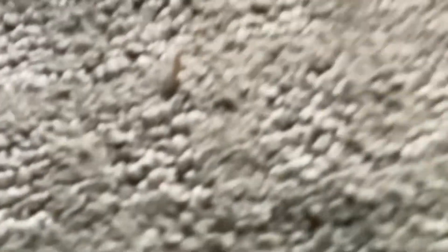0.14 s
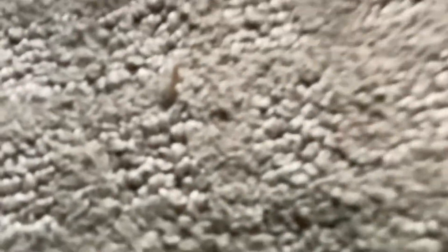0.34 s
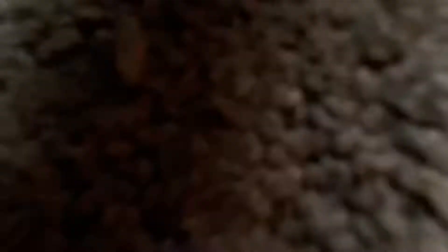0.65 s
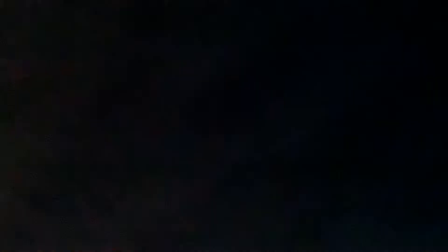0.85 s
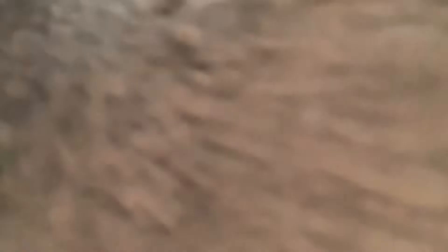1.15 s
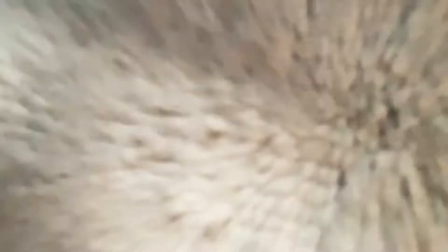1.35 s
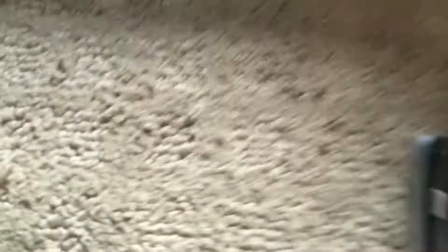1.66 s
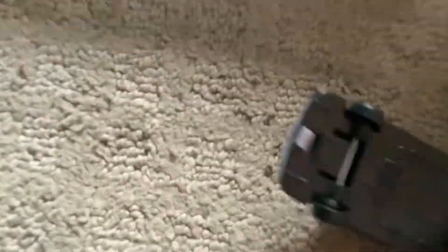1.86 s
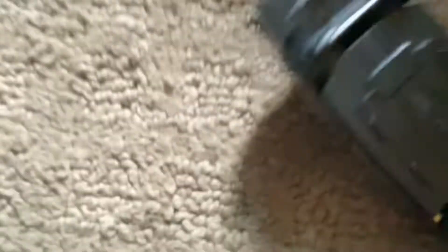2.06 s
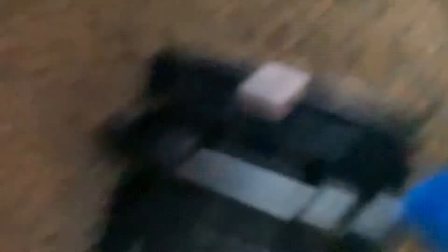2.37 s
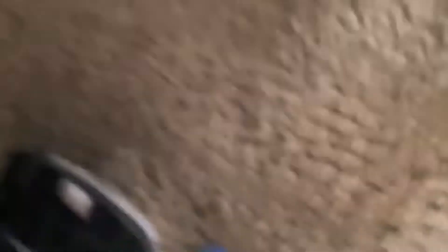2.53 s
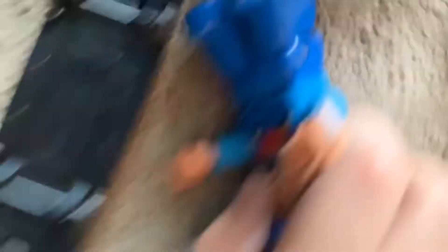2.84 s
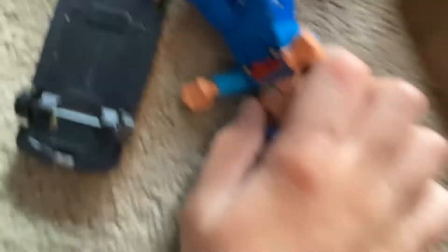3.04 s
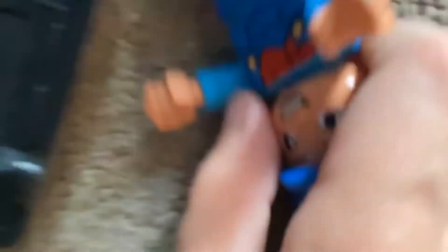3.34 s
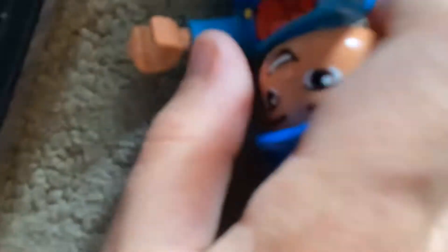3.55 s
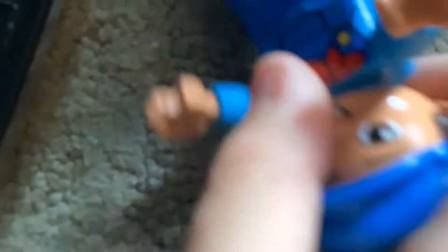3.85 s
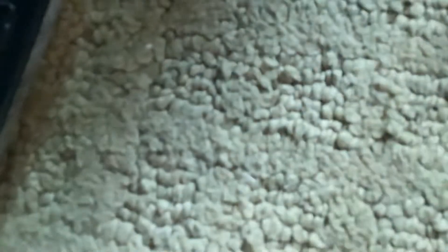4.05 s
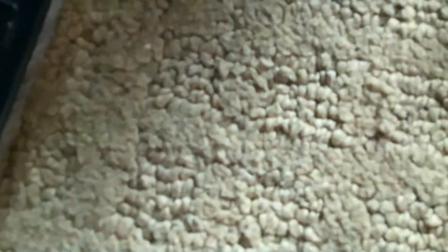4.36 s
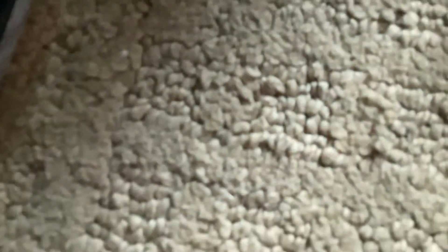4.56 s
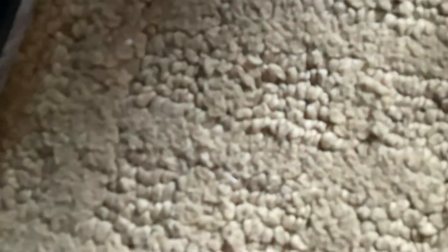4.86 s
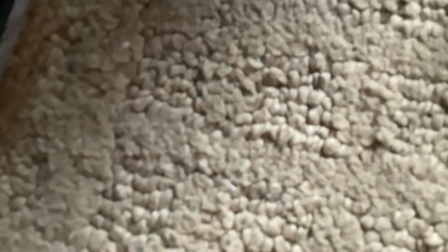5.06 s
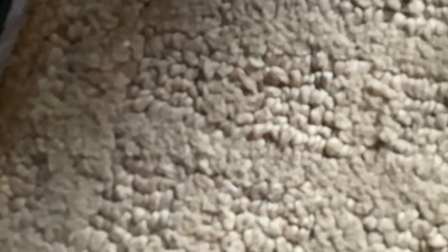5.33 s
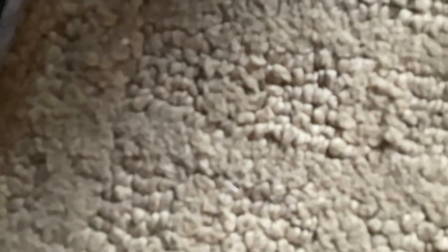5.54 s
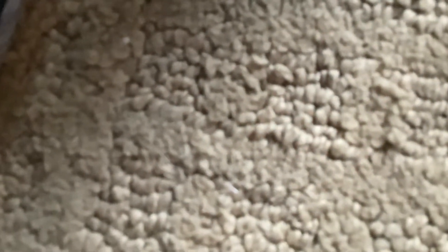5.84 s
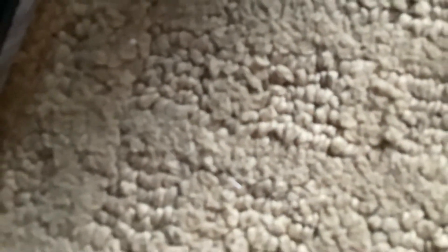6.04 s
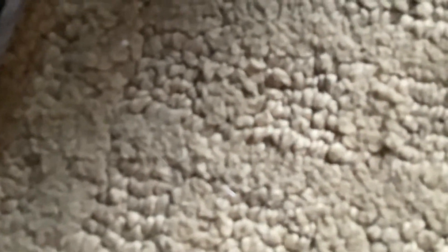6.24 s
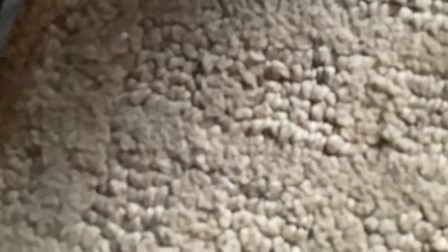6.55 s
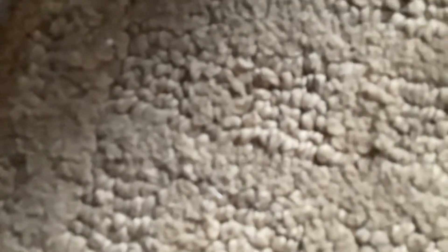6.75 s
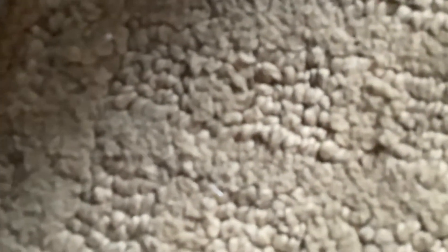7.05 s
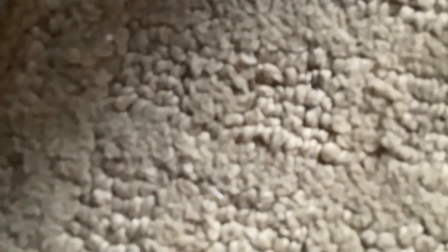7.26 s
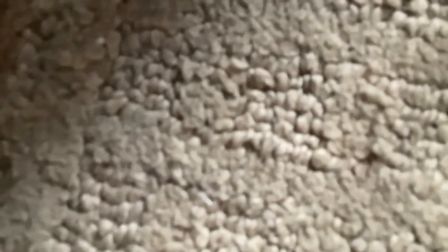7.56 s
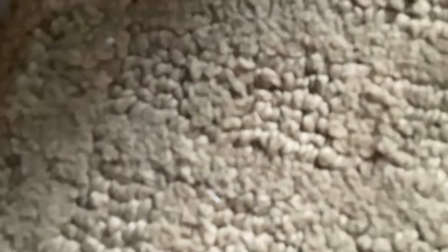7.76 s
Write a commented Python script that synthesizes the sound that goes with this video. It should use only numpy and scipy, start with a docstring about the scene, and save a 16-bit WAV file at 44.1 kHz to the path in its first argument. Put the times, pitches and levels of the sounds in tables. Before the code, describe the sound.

A toy figure's plastic parts snap and slide very near the microphone, ending in one hollow clack. The phone is gripped and bumped, giving loud rubs, cracks and low thuds, then one more heavy bump. Dull finger taps patter softly. More distant plastic bricks click against each other over carpet, quick and uneven, before fading into the quiet, low hum of a dry indoor room.

```python
"""Plastic clicks, scrapes and one hollow clack are heard close by, among rubs, knocks and soft taps.
A hand moves a toy figure about on a carpet while the other holds a phone: struck and sliding parts
ring in their modes, and skin slips over the case. Loose plastic bricks are picked over further off,
as short ticks with scuffs between them. A low hum of shaped noise fills the small, dead room."""
import sys
import numpy as np
from scipy import signal
from scipy.fft import rfft, irfft, next_fast_len
from scipy.io import wavfile
from scipy.ndimage import uniform_filter1d

SR = 44100
rng = np.random.default_rng(int(sys.argv[2]) if len(sys.argv) > 2 else 0)


def wav_record(signal):
    """Record a signal, one row per channel, as 16-bit PCM in the file named by sys.argv[1]."""
    frames = np.transpose(np.atleast_2d(signal))
    bounded = np.clip(frames, -1, 1)
    # unit amplitude maps onto the largest positive 16-bit level
    quanta = np.round(bounded * 32767).astype(np.int16)
    wavfile.write(sys.argv[1], SR, quanta)


N = 348390
TIME = np.arange(N) / SR
BLOW = np.arange(SR // 5) / SR  # time since a contact [s]
HEAD = SR // 100  # a blow's level is its rms over the first 10 ms [samples]

# modes of a brick: (frequency [Hz], level [dB], t60 relative to the blow's [ratio])
BRICK_MODES = [(478, -6.5, 1.53), (735, -6.5, 1.1), (1150, -10, 0.65), (2430, 0.5, 0.85),
               (3050, -5.5, 0.85), (3760, -3.5, 1.35), (5610, -7.5, 1.07), (7400, -3, 1.66)]


def undb(db):
    """Decibels to gain."""
    return 10 ** (db / 20)


def unit(x):
    """Scale to rms 1."""
    return x / np.sqrt(np.mean(x ** 2))


def blow(x, db):
    """Set the level of a blow's attack."""
    return x * undb(db) / np.sqrt(np.mean(x[:HEAD] ** 2))


def fade(t60):
    """Exponential decay after a contact, down 60 dB after t60 seconds."""
    return np.exp(-np.log(1000) * BLOW / t60)


def band(x, edges, kind, order=2):
    """Causal Butterworth filter."""
    return signal.sosfilt(signal.butter(order, edges, kind, fs=SR, output="sos"), x)


def resonate(x, hz, q):
    """One resonance, gain 1 at its centre."""
    return signal.lfilter(*signal.iirpeak(hz, q, fs=SR), x)


def colour(x, points):
    """Shape a spectrum by (Hz, dB) points, joined along log frequency; rms 1."""
    hz, db = np.transpose(points)
    size = next_fast_len(N)
    f = np.maximum(np.fft.rfftfreq(size, 1 / SR), 1)
    gain = undb(np.interp(np.log(f), np.log(hz), db))
    return unit(irfft(rfft(x, size) * gain, size)[:N])


def walk(rate):
    """Smooth random wander through about rate new values a second; rms 1."""
    k = int(SR / rate)
    steps = np.repeat(rng.standard_normal(N // k + 1), k)
    return unit(uniform_filter1d(steps, k)[:N])


def grains(rate, spread_db):
    """Tiny slips of unequal size and random sign, about rate a second; rms 1."""
    size = undb(spread_db * np.minimum(rng.exponential(size=N), 3))
    slipping = rng.random(N) < rate / SR
    return unit(slipping * size * rng.choice([-1, 1], N))


def add(out, s, x):
    """Mix a blow in at time s."""
    i = int(s * SR)
    out[i:i + len(x)] += x[:N - i]


def spells(table, attack_s, sag_db_per_s, release_s):
    """Gain of sustained movements: each sets in, drifts steadily in level, and dies away."""
    gain = np.zeros(N)
    for s, length, db in table:
        age = np.maximum(TIME - s, 0)
        attack = np.minimum(age / attack_s, 1)
        level = undb(db - sag_db_per_s * np.minimum(age, length))
        release = np.exp(-np.maximum(age - length, 0) / release_s)
        gain += attack * level * release
    return gain


def swell(middle_s, length_s):
    """Gain of one stroke: it rises to a rounded peak and falls a little faster."""
    end_db, roundness, lean = 3.5, 2.06, 0.054  # the drop near each end is about end_db
    along = np.clip(2 * (TIME - middle_s) / length_s, -10, 10)
    leaning = along * (1 + lean * np.sign(along))
    return undb(-end_db * np.abs(leaning) ** roundness)


def disperse(x, turns):
    """Bending waves: each pitch arrives about turns of its own cycles late, a quick downward sweep."""
    f = np.fft.rfftfreq(len(x), 1 / SR) + 80  # the offset limits the delay of the bass
    return irfft(rfft(x) * np.exp(-2j * np.pi * turns * np.log(f / f[-1])), len(x))


def weigh(x, db, body_db, edge_db):
    """A heavy contact moves the body, a hard one sharpens the edge, a soft one dulls the ring."""
    low, high = 1500, 7000  # where the body ends and the edge begins [Hz]
    top = np.clip(high * 2 ** ((edge_db + 11.5) / 32), 2 * low, high)
    ring = blow(band(x, [low, top], "bandpass", order=4), db)
    body = blow(band(x, low, "lowpass", order=6), db + body_db)
    edge = blow(band(x, [high, 2 * high], "bandpass", order=3), db + edge_db)
    return ring + body + edge


def chatter(x, count, spread_s, size):
    """Loose parts touch several more times in quick succession, later touches tending lighter."""
    out = x.copy()
    for late, weight in rng.random((count, 2)):
        echo = np.pad(x, (int(late * spread_s * SR), 0))[:len(x)]
        out += echo * size * (1 - late / 2) * (2 * weight - 1)
    return out


def strike(modes, t60, ring_hz, crack, scatter_db, detune, contact_s):
    """A plastic part is hit: a noise crack and its modes, weighted anew by each point of contact."""
    hz, mode_db, hold = np.transpose(modes)
    shift, weight, side = rng.standard_normal((3, len(hz)))
    gains = np.sign(side) * undb(mode_db + scatter_db * weight)
    x = crack * rng.standard_normal(len(BLOW)) * fade(t60)
    for f, g, h in zip(hz * (1 + detune * shift), gains, hold):
        x += g * np.sin(2 * np.pi * f * BLOW) * fade(t60 * h)
    # the part that is touched rings most, and the push takes a moment to build
    return (x + 1.5 * resonate(x, ring_hz, 3.4)) * (1 - fade(contact_s))


def sliding(modes, gain, rate, spread_db, q, wander_s, scrape_db):
    """Stick and slip scrapes and keeps modes ringing; they swell and bend as the contact moves."""
    slips = grains(rate, spread_db)
    ring = sum(undb(db + 4.5 * walk(25)) * resonate(slips, hz, q * hold) for hz, db, hold in modes)
    bent = np.interp(TIME + wander_s * walk(24), TIME, ring)
    scrape = band(slips, [2000, 12000], "bandpass")
    return (unit(bent) + undb(scrape_db) * unit(scrape)) * gain


def room(x, t60, wet_db, dull_hz):
    """A short, quiet noise tail, its treble rolled off above dull_hz: the carpet swallows most of it."""
    tail = rng.standard_normal(len(BLOW)) * fade(t60) * (BLOW > .005)
    tail = band(tail, dull_hz, "lowpass", order=1)
    return x + undb(wet_db) * signal.fftconvolve(x, tail / np.linalg.norm(tail))[:len(x)]


def hum():
    """Low ventilation rumble and faint hiss from shaped noise, with a narrow drone of filtered noise."""
    # spectrum of rumble and hiss: (frequency [Hz], density [dB per Hz])
    spectrum = [(30, -38.5), (60, -12.5), (80, -10), (96, 0), (125, -11), (205, -10), (330, -22),
                (520, -29.5), (1100, -46), (3500, -52), (10000, -55), (16000, -63.5)]
    rumble = colour(rng.standard_normal(N), spectrum) * undb(-55.5 + 0.16 * walk(1.7))
    drone = unit(band(rng.standard_normal(N), [89, 101], "bandpass"))
    return rumble + undb(-59.5) * drone


def brick_tick(db, body_db, edge_db, body_hz):
    """One brick of random size cracks on another: rough tick, lower body, dull floor thud, room tail."""
    size_hz = 3000 * 2 ** rng.uniform(-0.52, 0.46)
    tick = strike(BRICK_MODES, 0.013, size_hz, crack=2.55, scatter_db=2.5, detune=0.051, contact_s=0.0071)
    tick = band(tick + 2 * resonate(tick, body_hz, 3.2), 140, "highpass")
    tick = weigh(chatter(tick, count=5, spread_s=0.009, size=.65), db, body_db, edge_db)
    thud = band(rng.standard_normal(len(BLOW)) * fade(0.084), [130, 260], "bandpass")
    thud = blow(thud, db + body_db - 5.5)  # the carpeted floor
    return room(disperse(tick + thud, turns=1.399), t60=0.18, wet_db=-15.5, dull_hz=2930)


def bricks():
    """Loose bricks click, and in between they nudge and scuff each other and rumble on the carpet."""
    # single clicks: (time [s], level [dB], body re level [dB], edge re level [dB], body pitch [Hz])
    ticks = [(4.806, -52, 10.5, -11, 478), (4.8182, -57, 9, -22, 430), (4.8627, -57, 9, -13, 445),
             (4.929, -53.5, 1, -35, 560), (4.985, -54.5, -2, -6.5, 596), (5.018, -56, 0, -33, 640),
             (5.1344, -45.5, -2.5, -6, 500), (5.14, -51.5, 6, -15, 680), (5.252, -60.5, 12, -14, 252),
             (5.3318, -58.5, -1.5, -8, 494), (5.389, -55, -3, -39, 600), (5.4693, -45.5, 4, -18.5, 740),
             (5.5491, -62, 10, -36, 551), (5.8112, -67.5, 10, -27, 511), (5.8781, -65.5, 0.5, -11, 520),
             (6.082, -70, 14.5, -36, 1200), (6.1336, -50.5, -2.5, -27, 1200), (6.1756, -67.5, 7, -17, 750),
             (6.2225, -56, -4.5, -30, 1250), (6.266, -63.5, 1, -5, 1144), (6.3034, -61, -0.5, -39, 1200),
             (6.3749, -48, 9, -5.5, 910), (6.4123, -48, 1, -16, 890), (6.4715, -54, 4, -7, 600),
             (6.4871, -42.5, 0.5, -15.5, 690), (6.5454, -43.5, -1, -14, 520), (6.724, -58.5, 10, -16, 516)]
    # spells in which bricks shift among each other: (start [s], length [s], reference level [dB])
    shifts = [(4.797, 0.74, -70.5), (6.086, 0.22, -74), (6.46, 0.13, -58), (6.959, 0.21, -77.5)]
    # one brick drags over another: (middle [s], length [s], level [dB], strongest ring [Hz])
    drags = [(5.125, 0.031, -62, 2000), (5.334, 0.022, -60.5, 7600), (5.433, 0.026, -64, 4600),
             (6.115, 0.034, -69, 1690), (6.542, 0.021, -49, 2400), (6.905, 0.056, -70.5, 2150)]
    out = np.zeros(N)
    for s, db, body_db, edge_db, body_hz in ticks:
        add(out, s, brick_tick(db, body_db, edge_db, body_hz))

    gap_s = 0.016  # mean time between small touches
    for start, length, db in shifts:
        slots = np.arange(start, start + length, gap_s)
        for s, (late, force) in zip(slots, rng.standard_normal((len(slots), 2))):
            touch = brick_tick(db - 3 + 3 * force, body_db=9.5, edge_db=-18, body_hz=585)
            add(out, s + gap_s * late / 2, touch)

    # slow shifting is softer and duller than a tick, and rings in the bricks' modes
    stir = spells(shifts, attack_s=0.008, sag_db_per_s=0, release_s=0.04) * undb(3.5 * walk(50))
    uneven = undb(3.5 * walk(120))
    grit = sliding(BRICK_MODES, uneven, rate=1300, spread_db=3.0, q=5.8, wander_s=0.0012, scrape_db=-17)
    shifting = undb(-7.5) * stir * band(grit, 6000, "lowpass", order=1)
    scuffs = sum(undb(db) * swell(s, length) * unit(resonate(grit, hz, 1.8)) for s, length, db, hz in drags)
    # the pile's rumble on the carpet stops growing with harder handling
    rumble = unit(band(rng.standard_normal(N), [130, 260], "bandpass"))
    pile = np.minimum(stir, undb(-66.5)) * undb(12.5) * rumble
    return out + scuffs + shifting + pile


def taps():
    """Soft fingertips give a dull, damped sine blip, the nail a faint tick of filtered noise."""
    # fingertip taps: (time [s], pad level [dB], nail re pad [dB])
    touches = [(2.141, -47, -17), (2.303, -48.5, -19), (2.8878, -47.5, -14), (3.097, -51.5, -7.5),
               (3.254, -47.5, -9), (3.352, -48, -11), (3.4116, -53.5, -9), (3.46, -50.5, -36.5),
               (3.503, -58.5, -16), (3.646, -53, -14), (3.7152, -56, -11.5), (3.824, -56.5, -13),
               (3.9796, -53.5, -17), (4.0301, -56.5, -17), (4.1254, -58.5, -14), (4.283, -59.5, -13.5),
               (4.3328, -61, -19.5)]
    out = np.zeros(N)
    for s, db, nail_db in touches:
        hz = 535 * (1 + 0.11 * rng.standard_normal())
        pad = np.sin(2 * np.pi * hz * BLOW) * fade(0.018) * (1 - fade(0.023))
        nail = band(rng.standard_normal(len(BLOW)) * fade(0.13), [1100, 2100], "bandpass", order=3)
        add(out, s, blow(pad, db) + blow(nail, db + nail_db))
    return out


def rubbing():
    """Skin and cloth drag over the case in dense, uneven slips, giving a dull rub, a rasp and a hiss."""
    # strokes over the case: (middle [s], length [s], level [dB], hiss re level [dB])
    strokes = [(0.104, 0.025, -56, -16), (0.494, 0.044, -40.5, -7.5), (0.551, 0.12, -52, -1),
               (0.781, 0.09, -48.5, -8), (0.862, 0.046, -38.5, -8), (0.967, 0.094, -28, -43),
               (1.067, 0.04, -33, -24.5), (1.146, 0.088, -36, -37.5), (1.28, 0.072, -43, -19),
               (1.377, 0.085, -50, -5.5), (1.567, 0.09, -47.5, -31), (1.76, 0.13, -45, -15),
               (2.444, 0.12, -42.5, -35), (2.512, 0.078, -42.5, -7.5), (2.564, 0.019, -39.5, -18),
               (2.645, 0.091, -52.5, -22), (2.79, 0.084, -49, -8), (2.97, 0.11, -47, -14),
               (3.374, 0.095, -59, -8), (3.69, 0.079, -68.5, -18), (3.808, 0.12, -70, 6.5),
               (4.436, 0.067, -68.5, -18), (7.295, 0.046, -84.5, 5.5), (7.553, 0.06, -87, 15),
               (7.766, .05, -80.5, -5)]
    # the palm creeps on the case while the grip shifts: (start [s], length [s], level [dB])
    grips = [(0, 0.48, -67.5), (1.4, 0.72, -56), (2.08, 0.73, -63), (3.1, 0.23, -71)]
    # spectra of the dull rub, the rasp and the hiss: (frequency [Hz], density [dB per Hz])
    skin_spectrum = [(100, -23), (290, -5.5), (550, -0.5), (1400, -1), (2000, -4.5), (2700, -11),
                     (4000, -23.5), (7000, -54.5)]
    rasp_spectrum = [(1200, -23.5), (2500, -3.5), (3500, -1.5), (6050, -5.5), (6400, -27), (9000, -50)]
    hiss_spectrum = [(4500, -27.5), (6400, 2), (10000, 2.5), (13000, -4), (16000, -7.5)]
    slips = grains(rate=2600, spread_db=4) + .5 * rng.standard_normal(N)
    slips *= undb(1.8 * walk(70))

    moves = [(undb(db) * swell(s, length), hiss_db) for s, length, db, hiss_db in strokes]
    creep = spells(grips, attack_s=0.0035, sag_db_per_s=-1.0, release_s=0.0104)
    moves.append((creep, -11.5))
    # movements add in power; the rasp gains 0.42 dB per dB of hiss
    drag = np.sqrt(sum(gain ** 2 for gain, _ in moves))
    rasp = np.sqrt(sum((gain * undb(0.5 + 0.42 * hiss_db)) ** 2 for gain, hiss_db in moves))
    hiss = np.sqrt(sum((gain * undb(hiss_db)) ** 2 for gain, hiss_db in moves))

    skin = colour(slips, skin_spectrum)
    # the case's resonances come and go as the contact travels
    skin = unit(skin + sum(walk(25) * resonate(skin, hz, 4.5) for hz in (620, 1150, 1850)) / 2)
    # a firm stroke makes the case itself resound
    pressure = np.clip((20 * np.log10(drag + 1e-9) + 36.3) / 15, 0, 1)
    case = unit(resonate(resonate(skin, 1700, 1.5), 1700, 1.5))
    skin = (1 - 0.56 * pressure) * skin + pressure * case
    return skin * drag + colour(slips, rasp_spectrum) * rasp + colour(slips, hiss_spectrum) * hiss


def thumps():
    """A jolt swings the phone in the soft grip of the hand: a damped sine with rustle, swept downward."""
    # jolts: (time [s], level [dB], pitch [Hz], t60 [s])
    jolts = [(0.867, -38, 152, 0.035), (0.997, -30, 233, 0.012), (1.053, -27, 208, 0.012),
             (1.124, -23.5, 180, 0.019), (1.467, -40, 291, 0.024), (1.474, -37.5, 180, 0.065),
             (2.477, -27.5, 173, 0.041), (2.479, -24.5, 81, 0.13)]
    out = np.zeros(N)
    for s, db, hz, t60 in jolts:
        rustle = unit(band(rng.standard_normal(len(BLOW)), [hz / 2, 2 * hz], "bandpass"))
        sway = (np.sin(2 * np.pi * hz * BLOW) + 0.35 * rustle) * fade(t60) * (1 - fade(0.017))
        add(out, s, disperse(blow(sway, db), turns=1.2))
    return out


def knocks():
    """The phone case answers a knock with a crack, a few falling swings and a brief rattle."""
    # knocks: (time [s], case level [dB], edge re case [dB], case pitch [Hz], sharpness of the ring [Q])
    hits = [(0.8054, -35, -34, 1040, 3.5), (0.823, -39, -7.5, 1080, 2.8), (0.866, -40.5, -6, 800, 1.8),
            (0.9976, -15, -31.5, 1390, 5.3), (1.0135, -28.5, -25, 815, 5), (1.035, -36, -17, 950, 3),
            (1.048, -26, -11, 1800, 8.6), (1.0562, -22, -23, 776, 7.9), (1.1244, -22.5, -30, 1060, 3.6),
            (1.143, -33.5, -14, 715, 3.6), (2.48, -12.5, -21, 1150, 1.4), (2.499, -23, -18, 944.5, 1.8),
            (2.5058, -32.5, -7.5, 2100, 3.6), (2.568, -45, -10, 790, 0.8)]
    out = np.zeros(N)
    for s, db, edge_db, hz, q in hits:
        noise = rng.standard_normal(len(BLOW))
        push = signal.unit_impulse(len(BLOW)) + .028 * noise * fade(.028)
        case = band(resonate(push, hz, q), [490, 3300], "bandpass", order=3)
        case = disperse(case, turns=0.8)
        edge = band(noise * fade(0.013), [2800, 11000], "bandpass")
        add(out, s, blow(case, db) + blow(edge, db + edge_db))
    return out


def toy():
    """The figure's joints click and slide, ringing in its modes; its hollow shell clacks once."""
    # joint clicks: (time [s], level [dB], body below 1.5 kHz re level [dB],
    # edge above 7 kHz re level [dB], t60 [s], strongest ring [Hz])
    clicks = [(0.122, -53.5, 11.5, -8.5, 0.01, 1400), (0.168, -33, -28, -1, 0.034, 3160),
              (0.182, -22, -20, -1, 0.014, 2600), (0.1987, -27, -19, -7.5, 0.022, 2850),
              (0.2317, -35.5, -22, 2, 0.038, 3430), (0.2657, -49.5, -16, 2, 0.023, 3400),
              (0.2869, -41.5, -34, -1.5, 0.023, 5200), (0.2895, -33.5, -42, -4, 0.012, 5600),
              (0.4098, -41, -33.5, 3, 0.029, 2740), (0.432, -37.5, -29.5, -6, 0.052, 5100),
              (0.596, -57, 1, 7, 0.01, 6060), (0.8955, -32, -16.5, -9.5, 0.0067, 4200),
              (2.1234, -36, -25, -14.5, 0.016, 5130), (2.1484, -36.5, -19, -10, 0.062, 5200),
              (2.186, -44.5, -30, -20, 0.057, 5130), (2.233, -53.5, -18, -2, 0.013, 5600),
              (2.2489, -26, -27, -8.5, 0.027, 2650), (2.259, -35, -22, -12.5, 0.013, 5400),
              (2.295, -47, -22, -15, 0.035, 5000), (2.303, -43, -19, -7.5, 0.02, 5100),
              (2.7395, -50, -24, -10, 0.048, 5000)]
    # the hollow shell snaps down: the same columns and units
    clacks = [(0.4691, -17.5, -4, -7.5, 0.025, 2036)]
    # plastic slides on plastic: (start [s], length [s], level at the start [dB])
    slides = [(.168, 0.1, -39.5), (.415, 0.044, -46), (2.11, 0.08, -52), (2.25, 0.082, -56.5)]
    # modes of the joints and of the shell: (frequency [Hz], level [dB], t60 relative to the blow's [ratio])
    joint_modes = [(1855, -13, 0.44), (2640, -4.5, 0.99), (3020, -10, 0.4), (3510, -6, 0.93),
                   (4276, -6, 0.7), (5030, -5.5, 1.5), (5310, -4, 1.2), (5960, -9, 0.73), (9300, -13, 0.55),
                   (10470, -14.5, 1.18), (12750, -9.5, 1.1)]
    shell_modes = [(408, -10, 2.008), (878, -0.5, 0.65), (1051, -9.5, 1.3), (1590, -6.5, 1),
                   (2095, -3.5, 1.7), (2930, 0.5, 0.42), (3970, 1, 0.75), (11530, 7, .5)]
    out = np.zeros(N)
    for s, db, body_db, edge_db, t60, hz in clicks:
        click = strike(joint_modes, t60, hz, crack=1.4, scatter_db=3.5, detune=0.022, contact_s=0.003)
        click = chatter(click, count=3, spread_s=0.2 * t60, size=.7)
        add(out, s, weigh(click, db, body_db, edge_db))
    for s, db, body_db, edge_db, t60, hz in clacks:
        clack = strike(shell_modes, t60, hz, crack=2.0, scatter_db=6.0, detune=0.013, contact_s=0.001)
        add(out, s, disperse(weigh(clack, db, body_db, edge_db), turns=1.1))
    push = spells(slides, attack_s=0.011, sag_db_per_s=72.5, release_s=0.024)
    return out + sliding(joint_modes, push, rate=2100, spread_db=3.5, q=8.6, wander_s=0.00055, scrape_db=-6.5)


def scene():
    """Hum, far bricks, contact sounds that reach the phone through its case, and the near toy."""
    contact = taps() + rubbing() + thumps() + knocks()
    near = room(toy(), t60=0.11, wet_db=-20.0, dull_hz=1500)
    return (hum() + bricks() + contact + near)[None]


def record(dry):
    """The phone drops the deepest bass, rounds the highest peaks and cuts the top above 15.6 kHz."""
    x = np.tanh(band(dry, 45, "highpass", order=3) / 2) * 2
    return signal.sosfilt(signal.ellip(8, .2, 70, 15600, fs=SR, output="sos"), x)


dry = scene()
out = record(dry)
wav_record(out)
```